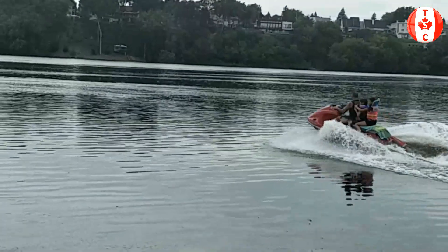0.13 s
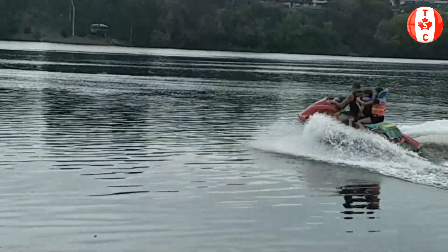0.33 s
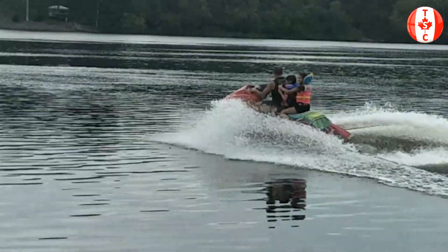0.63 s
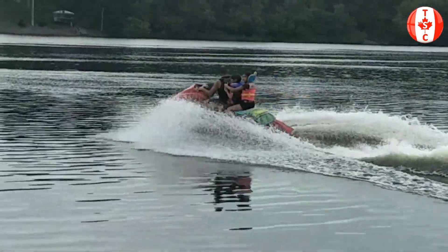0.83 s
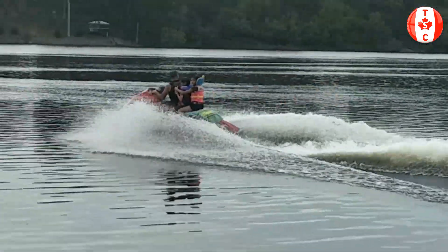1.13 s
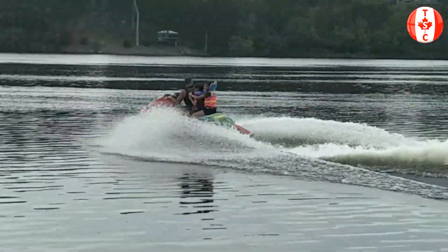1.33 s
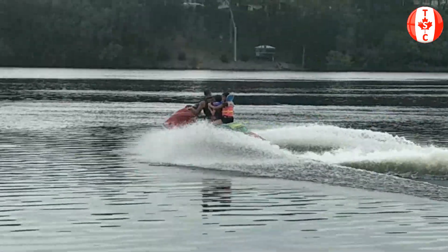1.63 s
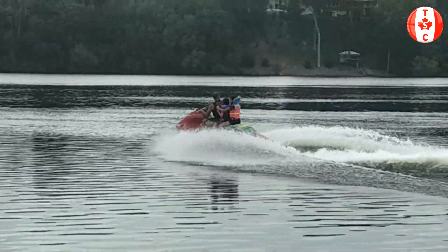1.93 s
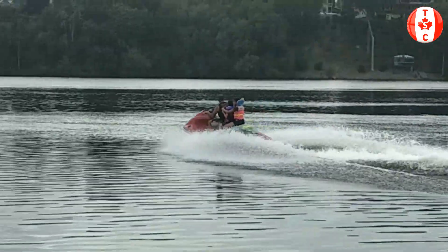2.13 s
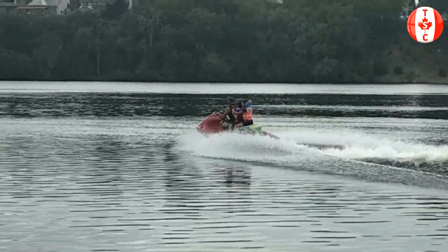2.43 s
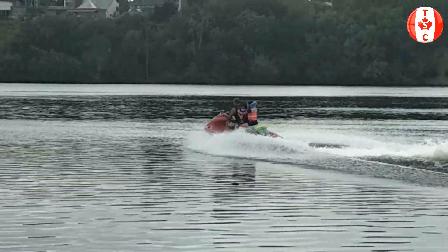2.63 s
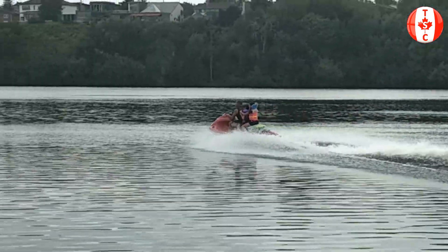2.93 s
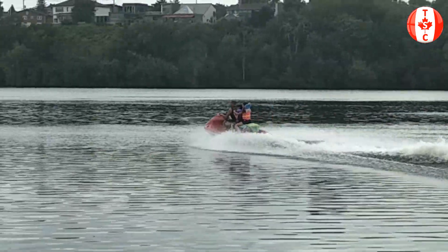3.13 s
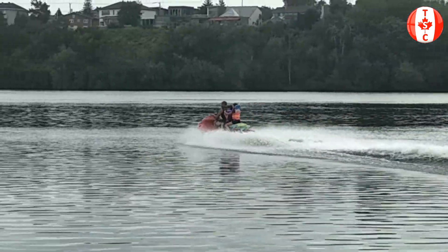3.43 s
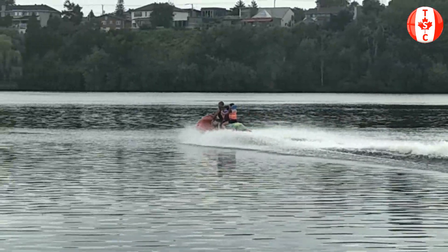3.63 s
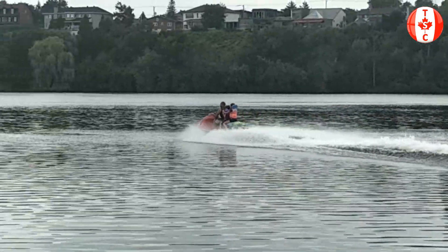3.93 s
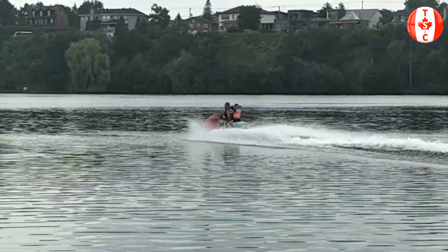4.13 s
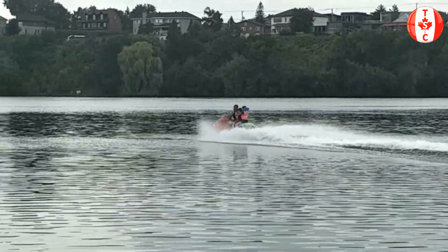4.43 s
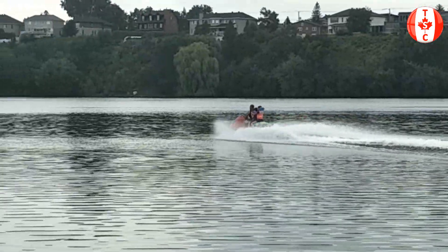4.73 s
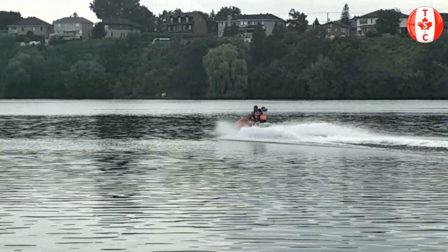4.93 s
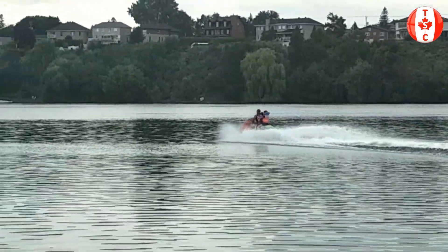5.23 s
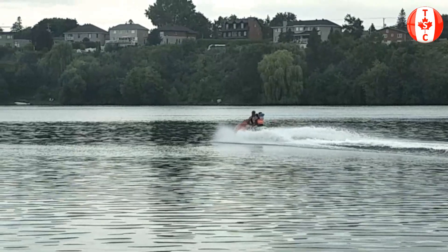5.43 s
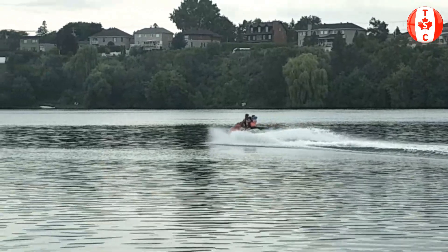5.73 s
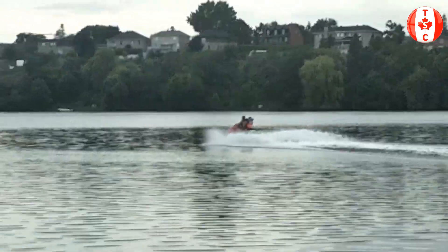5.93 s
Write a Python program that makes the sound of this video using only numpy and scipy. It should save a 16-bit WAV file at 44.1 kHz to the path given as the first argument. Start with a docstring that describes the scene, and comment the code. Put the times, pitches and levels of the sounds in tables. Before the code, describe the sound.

A jet ski speeds across a calm river, heard from the bank through a phone's microphone. Its low, throbbing engine hum starts with a slight growl and a few soft booms from the hull. The growl fades while the hum slides down in pitch and grows stronger, then levels off. Churning water and hissing spray run steadily throughout.

```python
"""A jet ski carves away across a calm river, heard from the bank through a phone's two ports.
Its shaft hums at the turn rate and multiples, strongest the throbbing third, all sagging as the revs
drop, and the hull booms now and then. Under the hum, bands of flickering noise make the rumble and
wash, the jet's rasp, the hiss of spray and the roar of churned water. Something close behind the
phone throws a short echo of the water into each port."""
import sys
import numpy as np
from scipy import signal
from scipy.fft import rfft, irfft, next_fast_len
from scipy.io import wavfile
from scipy.ndimage import uniform_filter1d

SR = 44100
rng = np.random.default_rng(int(sys.argv[2]) if len(sys.argv) > 2 else 0)


def log_audio(samples):
    """Write samples as a 16-bit WAV file to the path given in sys.argv[1]."""
    # one column per channel
    frames = np.atleast_2d(samples).T
    # limit to full scale, then quantise
    limited = np.clip(frames, -1, 1)
    pcm = np.round(limited * 32767).astype(np.int16)
    wavfile.write(sys.argv[1], SR, pcm)


N = 267642
TIME = np.arange(N) / SR
HZ = np.fft.rfftfreq(next_fast_len(N), 1 / SR) + 1e-3
SIDE = np.array([[.5], [-.5]])  # splits a left-minus-right amount between the ports


def undb(db):
    """Gain of a level in dB."""
    return 10 ** (np.asarray(db) / 20)


def curves(table):
    """Automation lanes: each column after the time, at every sample."""
    times, *columns = np.transpose(table)
    return [np.interp(TIME, times, column) for column in columns]


def over_hz(table):
    """A (frequency, value) table at every frequency, straight on a log axis."""
    hz, value = np.transpose(table)
    return np.interp(np.log(HZ), np.log(hz), value)


def colour_gain(colour, db_per_octave=-40):
    """Gain of an EQ curve that rolls off steeply above its last point."""
    octaves_above = np.log2(np.maximum(HZ / colour[-1][0], 1))
    return undb(over_hz(colour) + db_per_octave * octaves_above)


def drift(rate_hz):
    """Smooth random modulation: sample-and-hold, slewed twice, with a spread of 1."""
    hold = int(SR / rate_hz)
    steps = np.repeat(rng.standard_normal(N // hold + 1), hold)
    smooth = uniform_filter1d(uniform_filter1d(steps, hold), hold)[:N]
    return smooth / smooth.std()


def swells(times, peaks, width_s):
    """Bell-shaped envelopes, one for each time."""
    return [peak * np.exp(-.5 * ((TIME - at) / width_s) ** 2) for at, peak in zip(times, peaks)]


# Paths into the left and right port: direct lag/ms, direct corner/Hz, echo lag/ms, echo level/dB,
# echo corner/Hz
PORT_PATHS = [(0.12, 2000, 1.523, -9, 6300), (0, 7700, 1.627, -10, 10000)]


def ports(spectrum):
    """One arrival at both ports: the phone's body shades the direct sound, a near surface returns it."""
    out = []
    for lag_ms, dull_hz, echo_ms, echo_db, echo_hz in PORT_PATHS:
        direct = np.exp(-2j * np.pi * HZ * lag_ms / 1e3) / (1 + (HZ / dull_hz) ** 2)
        echo = undb(echo_db) * np.exp(-2j * np.pi * HZ * echo_ms / 1e3) / (1 + (HZ / echo_hz) ** 2)
        power = np.abs(direct) ** 2 + np.abs(echo) ** 2
        out.append(spectrum * (direct + echo) / np.sqrt(power))  # evens the tilt, keeps the comb
    return np.array(out)


# Sound that arrives scattered, unrelated at the two ports: f/Hz, share of the power/0-1
SCATTERED_SHARE = [(60, 0.0089), (300, 0.0066), (430, 0.14), (650, 0.067), (900, 0.23), (1400, 0.27),
                   (1800, 0.6), (3000, 0.75), (7000, 1)]
# Stereo tilt of the ports: f/Hz, left minus right/dB
PORT_TILT = [(60, 3.3), (300, 3), (490, 1), (830, 3), (1400, 2.5), (1850, -1), (2150, 8), (2500, 0),
             (3000, -5), (3700, -4), (4200, 0), (5000, 4), (6300, 0), (7000, -17)]
# Water faders: t/s, churn/dB, spray/dB, mist/dB, fizz/dB, scatter trim for every band/dB
WATER_FADERS = [(0, -43.5, -50.5, -59.5, -71, 2), (.6, -42, -49, -56.5, -66, 2.5),
                (1.3, -42, -50, -57, -68.5, 3.5), (1.9, -40.5, -47.5, -55.5, -67, 1.5),
                (2.6, -42.5, -47, -54.5, -65.5, 0.5), (2.85, -42.5, -45, -53.5, -64.5, -0.5),
                (3.6, -41.5, -45, -53.5, -65, -0.5), (4.6, -43, -44.5, -53, -66, -0.5),
                (5.3, -43.5, -43.5, -53, -67, -1), (6.07, -42.5, -45.5, -54, -68, 1)]


def water(colour, level_db, flicker_db, flicker_hz):
    """A band of flickering noise: partly straight from the craft, partly scattered off water and banks."""
    size = next_fast_len(N)
    share = np.clip(over_hz(SCATTERED_SHARE), 0, 1)
    scatter_db = curves(WATER_FADERS)[-1]
    noise = rng.standard_normal((3, N)) * undb(flicker_db * drift(flicker_hz))
    direct = np.sqrt(1 - share) * ports(rfft(noise[0], size))
    scattered = np.sqrt(share) * rfft(noise[1:] * undb(scatter_db), size)
    balance = undb(over_hz(PORT_TILT) * SIDE)
    band = irfft((direct + scattered) * balance * colour_gain(colour), size)[:, :N]
    mono_rms = np.sqrt(np.mean(band.mean(0) ** 2))
    return band / mono_rms * undb(level_db)


# EQ of the wash and of the rumble: f/Hz, relative level/dB
WASH_EQ = [(40, -27.5), (60, -16), (100, -6), (150, -2.5), (195, 0.5), (240, 0.5), (310, 0), (350, -5),
           (420, -13.5), (520, -60.5)]
RUMBLE_EQ = [(15, -9.5), (25, 2.5), (45, 0.5), (70, -7.5), (110, -39)]
# Hull faders: t/s, wash/dB, rumble/dB
HULL_FADERS = [(0, -38, -72), (1.2, -38.5, -63), (2.2, -38, -67.5), (3, -36.5, -63.5), (4.2, -37, -56),
               (4.9, -38.5, -57.5), (5.4, -37, -56.5), (6.07, -37, -54)]


def hull_wash():
    """The low bed: water washes along the hull over a deep rumble."""
    wash_db, rumble_db = curves(HULL_FADERS)
    return (water(WASH_EQ, wash_db, flicker_db=.18, flicker_hz=5.4)
            + water(RUMBLE_EQ, rumble_db, flicker_db=.8, flicker_hz=2.9))


# EQ of the froth and of the rasp: f/Hz, relative level/dB
FROTH_EQ = [(580, -31.5), (670, -0.5), (750, 1.5), (850, -4.5), (950, -38.5)]
RASP_EQ = [(1600, -24.5), (1800, -5), (1950, 1.5), (2080, -2), (2200, -11.5), (2350, -33)]
# Jet faders: t/s, froth/dB, rasp/dB
JET_FADERS = [(0, -47.5, -61.5), (.6, -47.5, -57), (1.3, -47.5, -58.5), (2, -47, -58.5), (2.8, -46, -55.5),
              (3.6, -44.5, -55), (4.4, -47, -52), (5.2, -46.5, -53), (6.07, -46, -50)]


def jet():
    """Two narrow bands: froth on top of the churn, and the rasp of the jet."""
    froth_db, rasp_db = curves(JET_FADERS)
    return (water(FROTH_EQ, froth_db, flicker_db=.36, flicker_hz=6.1)
            + water(RASP_EQ, rasp_db, flicker_db=1, flicker_hz=5))


# EQ of the spray, the mist and the fizz: f/Hz, relative level/dB
SPRAY_EQ = [(650, -26.5), (850, -2), (1000, 4.5), (1180, -2.5), (1350, 2), (1550, -4), (1750, -5),
            (1950, -10), (2200, -8), (2450, -4.5), (2800, -14.5), (3150, -14.5), (4000, -20.5),
            (4700, -25.5), (5100, -64.5)]
MIST_EQ = [(2000, -27), (2700, -4.5), (2950, -1), (3200, 1), (3500, -2.5), (3750, -1), (4300, -7),
           (4700, -10.5), (5200, -40.5)]
FIZZ_EQ = [(4100, -30), (4600, -3), (5000, 0), (5600, -.5), (6000, -4.5), (6300, -4.5), (6600, -12.5),
           (7000, -19), (7300, -26), (7500, -31)]


def spray():
    """Spray hisses in the mids, falling mist above it, fizz at the very top."""
    _, spray_db, mist_db, fizz_db, _ = curves(WATER_FADERS)
    return (water(SPRAY_EQ, spray_db, flicker_db=.63, flicker_hz=5)
            + water(MIST_EQ, mist_db, flicker_db=.3, flicker_hz=5.5)
            + water(FIZZ_EQ, fizz_db, flicker_db=.5, flicker_hz=6.7))


# EQ of the churn: f/Hz, relative level/dB
CHURN_EQ = [(290, -31), (360, -5), (420, -1.5), (500, 2), (560, 2.5), (605, 3.5), (650, 1.5), (690, -3.5),
            (760, -29.5)]
# Surges of the churn: t/s, boost/dB
CHURN_SURGES = [(.3, 1), (.45, 3), (1.8, 1), (2.83, 6), (2.91, 1), (3.37, 3.5), (4.82, 2)]


def churn():
    """Churned water roars in the low mids, with brief surges."""
    times, boosts_db = np.transpose(CHURN_SURGES)
    level_db = curves(WATER_FADERS)[0] + sum(swells(times, boosts_db, width_s=.023))
    return water(CHURN_EQ, level_db, flicker_db=.55, flicker_hz=4)


# Booms of the hull: t/s, f/Hz, peak level before panning/dB
HULL_BOOMS = [(.03, 192.6, -35), (.2, 185.9, -44), (.52, 192, -33.5), (.98, 188, -39), (1.46, 195, -40),
              (1.92, 189.4, -41), (2.75, 195.5, -35.5), (3.05, 198.6, -37)]


def hull_booms():
    """The hull booms in short low tones with a soft attack."""
    times, pitches_hz, levels_db = np.transpose(HULL_BOOMS)
    envelopes = swells(times, undb(levels_db), width_s=.02)
    return sum(np.sqrt(2) * envelope * np.sin(2 * np.pi * hz * TIME)
               for envelope, hz in zip(envelopes, pitches_hz))


# Shaft hum: t/s, turn rate/Hz, first order/dB, second order/dB, third order/dB,
# left minus right/dB, left port's lag/ms
SHAFT_HUM = [(0, 91.3, -39.5, -48, -39.5, 2.5, .22), (.35, 90.6, -40.5, -42.5, -36.5, 3.5, .2),
             (.55, 89.6, -41, -45.5, -40, 3, .2), (.75, 89.3, -40.5, -48.5, -42.5, 2.5, .2),
             (1.05, 88.8, -39.5, -43.5, -40, 2.5, 0.17), (1.25, 88.5, -42.5, -50.5, -36, 2, 0.15),
             (1.8, 87.8, -43, -46.5, -37.5, 2, 0.08), (2.3, 87, -42.5, -44.5, -35.5, 3.5, .1),
             (2.8, 85.5, -40.5, -44.5, -28.5, 3.5, .14), (3.15, 84, -39, -43, -30, 4, 0.11),
             (3.5, 81.8, -37.5, -45, -32, 3.5, 0.094), (3.8, 79.6, -40, -44, -27.5, 3.5, .1),
             (4.03, 77.3, -42.5, -41.5, -25.5, 2.5, 0.11), (4.3, 73.6, -40.5, -42.5, -29.5, 2.5, .13),
             (4.5, 71.9, -39, -48.5, -25.5, 3, 0.11), (4.8, 69.8, -43, -48, -23, 2.5, .13),
             (5.1, 68.9, -39.5, -46, -27, 3, 0.09), (5.5, 68.7, -40.5, -46.5, -26, 3, .1),
             (6.07, 68.7, -40.5, -44, -26, 2.5, .1)]
# Throb of the third order, a row per beat: t of the dip/s, faster tone against the main tone/0-1
THROB_BEATS = [(.04, 0.1), (.25, 0.6), (.46, 0.53), (.67, 0.66), (.87, 0.33), (1.09, 0.84), (1.33, 0.05),
               (1.55, 0.2), (1.78, 0.35), (2.0, 0.16), (2.22, 0.05), (2.45, 0.14), (2.68, 0.15),
               (2.92, 0.14), (3.17, 0.15), (3.47, 0.2), (3.67, 0.25), (3.9, 0.27), (4.16, 0.18),
               (4.36, 0.26), (4.65, 0.15), (4.95, 0.32), (5.21, 0.4), (5.53, 0.3), (5.84, 0.3), (6.1, .27)]
# Undertone between the orders: multiple of the turn rate, level against the first order/dB
HALF_ORDER = [(1.5, -11.5)]
# Upper orders, which growl while the craft is nearest: multiple of the turn rate, trim/dB
GROWL_ORDERS = [(4, -11), (5, -4), (6, -1.5)]
# Growl fader: t/s, level/dB
GROWL_FADER = [(0, -51), (.22, -50.5), (.29, -42), (.37, -50), (.45, -43.5), (.53, -46), (.8, -48.5),
               (1.7, -52), (3, -55.5), (6.07, -63)]


def engine():
    """Shaft orders, wavering in the moving air between craft and bank, panned with the hull's booms."""
    hz, first_db, second_db, third_db, pan_db, lag_ms = curves(SHAFT_HUM)
    growl_db = curves(GROWL_FADER)[0]
    beats, depth = curves([(at, count, dip) for count, (at, dip) in enumerate(THROB_BEATS)])
    # a faster tone gains one cycle a beat on the third order, so the pair throbs
    throb = 1 - np.clip(depth, 0, .9) * np.exp(2j * np.pi * beats)
    # the orders below the third are tuned up in line with that faster tone
    detune = 2 * np.pi * uniform_filter1d(beats, SR // 2) / 3
    # voices: order, level/dB, phase waver/rad, modulator
    voices = [(1, first_db, .09, np.exp(1j * detune)), (2, second_db, .4, np.exp(2j * detune))]
    voices += [(order, first_db + db, .4, np.exp(1j * order * detune)) for order, db in HALF_ORDER]
    voices += [(3, third_db, .03, throb)]
    voices += [(order, growl_db + db, .3, 1) for order, db in GROWL_ORDERS]
    turn = 2 * np.pi * np.cumsum(hz) / SR
    turn_at_ports = turn - 2 * np.pi * hz * lag_ms / 1e3 * SIDE  # the left port lies further away
    hum = 0
    for order, level_db, waver, modulator in voices:
        phase = order * turn_at_ports + waver * drift(14)
        gain = undb(level_db + 4.9 * waver * drift(15))  # 4.9 dB of flutter per radian of waver
        hum = hum + np.sqrt(2) * gain * np.imag(modulator * np.exp(1j * phase))
    return (hum + hull_booms()) * undb(pan_db * SIDE)


def scene():
    """The stereo mix: the engine's hum over the layers of water."""
    return engine() + hull_wash() + jet() + spray() + churn()


# Notches of the microphone cavity: f/Hz, width/Hz, gain/dB
CAVITY_NOTCHES = [(4510, 55, -5), (4700, 50, -15), (4890, 55, -5.5)]


def record(dry):
    """The microphone cavity notches the treble; a steep low-pass in the phone cuts the top."""
    size = next_fast_len(N + SR)
    hz_axis = np.fft.rfftfreq(size, 1 / SR)
    notch_db = sum(db * np.exp(-((hz_axis - hz) / width) ** 2) for hz, width, db in CAVITY_NOTCHES)
    notched = irfft(rfft(dry, size) * undb(notch_db), size)[:, :N]
    top_hz = 7467
    return signal.sosfilt(signal.ellip(10, .2, 80, top_hz, fs=SR, output="sos"), notched)


dry = scene()
out = record(dry)
log_audio(out)
```